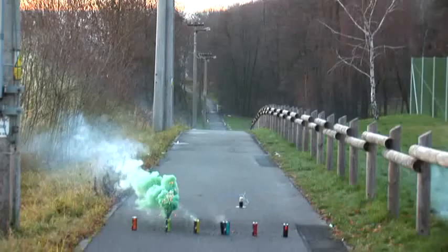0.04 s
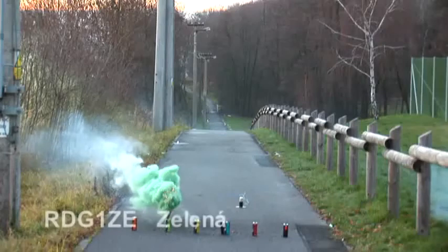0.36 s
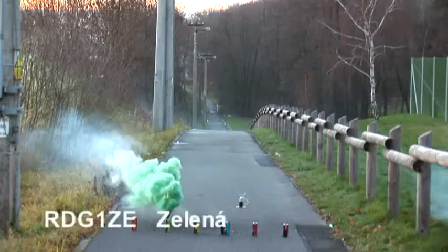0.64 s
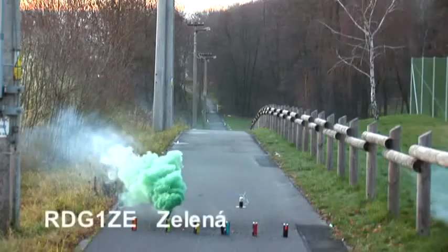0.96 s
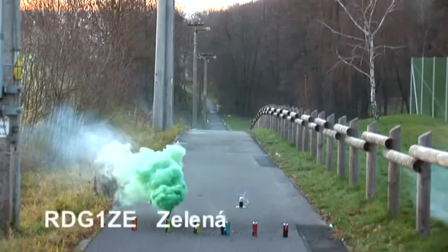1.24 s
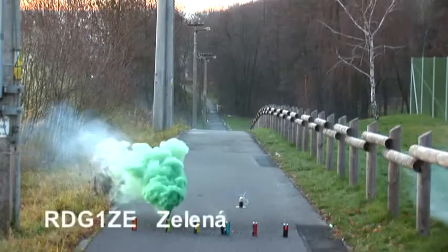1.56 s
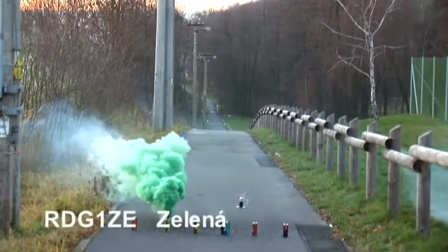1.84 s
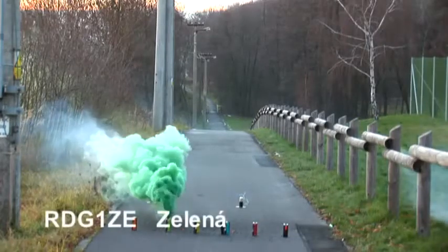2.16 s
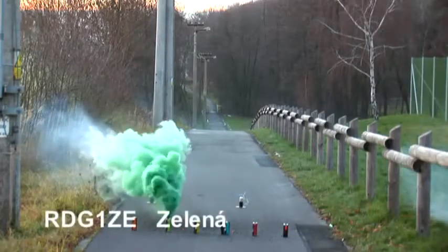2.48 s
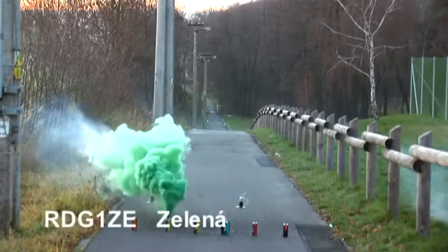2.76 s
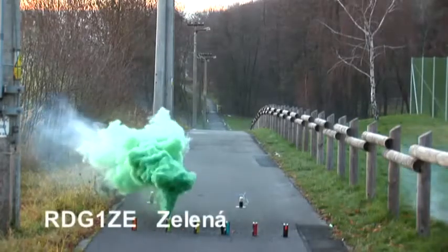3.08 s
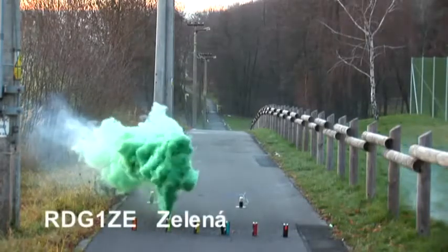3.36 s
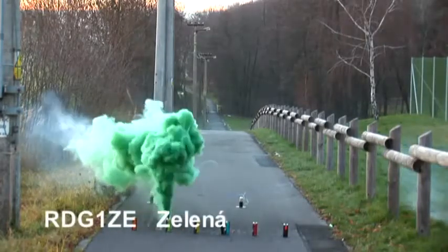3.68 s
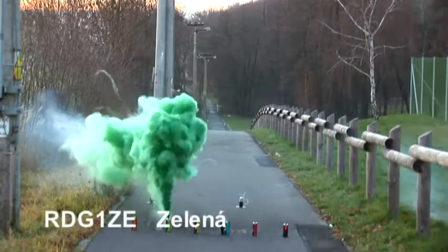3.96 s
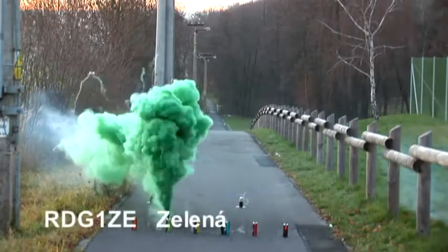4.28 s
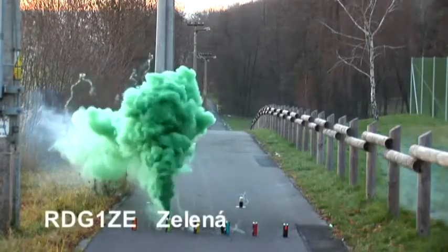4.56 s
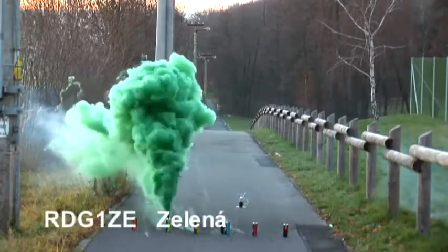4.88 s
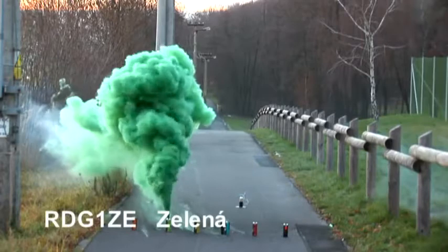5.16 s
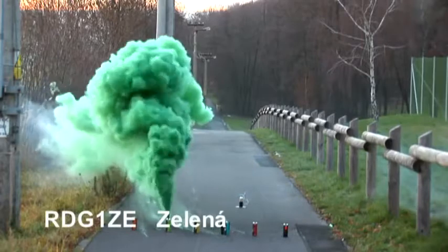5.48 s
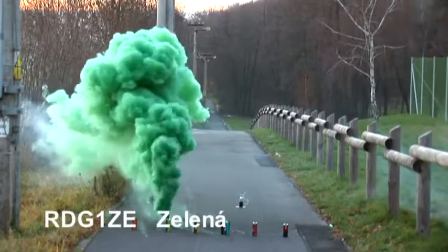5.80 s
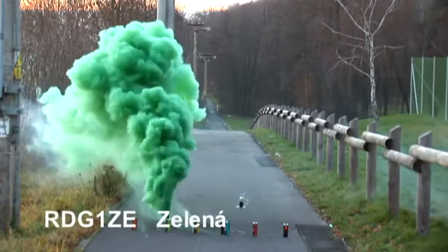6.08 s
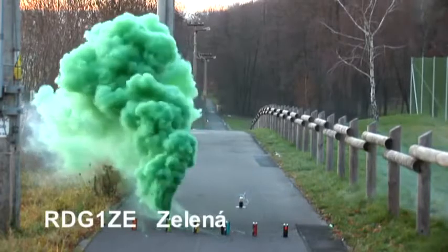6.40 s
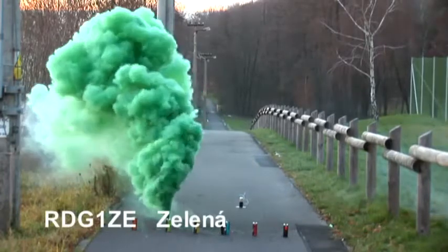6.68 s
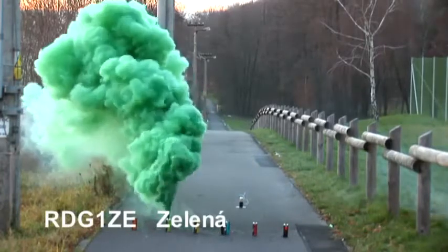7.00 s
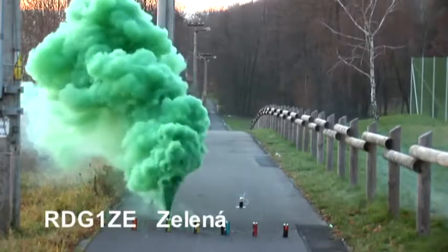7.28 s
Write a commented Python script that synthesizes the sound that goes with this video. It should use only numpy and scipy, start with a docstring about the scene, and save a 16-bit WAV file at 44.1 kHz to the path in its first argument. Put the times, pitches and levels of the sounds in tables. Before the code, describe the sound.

The sound starts abruptly at 0.2 seconds, outdoors, with a car's tyres rolling away on the left, drifting toward the centre and fading out by about 3 seconds. A steady wash and low rumble of distant traffic continues throughout. In front, a smoke canister hisses softly and unevenly, with a high sizzle and tiny crackles. It spits at 1.6 seconds and sizzles again near 1.9. From about 3.1 seconds the gas surges several times, peaking in a strong spurt at 3.5, followed by another spit and shorter surge near 4.4. The hiss then stays low with gentle swells. A faint, wavering engine drone emerges far away around 5 seconds, and the rumble grows slightly just before the end at 7.4. Underneath, the camera adds faint hiss, a thin motor whine and rapid light ticking, with sharper ticks near 2.2, 3.7, 4.1 and 5.8 seconds.

```python
"""Smoke canister on an outdoor path

Gas hisses and surges through the nozzle; slag sizzles, the charge crackles and spits now and then.
A car's tyres roll away on the left, leaving the wash, rumble and engine drone of distant traffic.
A small camera adds faint hiss, motor whine and drive ticks, a few louder. Sound starts abruptly at 0.2 s."""
import sys
import numpy as np
from scipy import signal
from scipy.fft import rfft, irfft
from scipy.io import wavfile

SR = 44100
rng = np.random.default_rng(int(sys.argv[2]) if len(sys.argv) > 2 else 0)


def int16_out(signal):
    """Quantize to a 16-bit WAV file."""
    q = np.round(np.clip(np.atleast_2d(signal).T, -1, 1) * 32767)
    wavfile.write(sys.argv[1], SR, q.astype(np.int16))


N = 328104
START_S = 0.197
TIME_S = np.arange(N) / SR
BINS_HZ = np.maximum(np.fft.rfftfreq(N, 1 / SR), 1)


def from_db(db):
    """Decibels to gain."""
    return 10 ** (np.asarray(db) / 20)


def unit_rms(x):
    """Scale to rms 1."""
    return x / np.sqrt(np.mean(x ** 2) + 1e-20)


def over_time(rows):
    """Each column of a curve, per sample."""
    t_s, *columns = np.transpose(rows)
    return [np.interp(TIME_S, t_s, c) for c in columns]


def over_hz(rows):
    """Each column of a spectrum, per bin."""
    hz, *columns = np.transpose(rows)
    return [np.interp(np.log(BINS_HZ), np.log(hz), c) for c in columns]


def colour(rows):
    """Gain per bin; falls 36 dB/octave beyond the table's ends."""
    outside = np.minimum(BINS_HZ / rows[0][0], 1) * np.minimum(rows[-1][0] / BINS_HZ, 1)
    return from_db(over_hz(rows)[0]) * outside ** 6


def white():
    """Spectrum of white noise."""
    return rfft(rng.standard_normal(N))


def drift(rate_hz):
    """Low-passed random wander, rms 1."""
    return unit_rms(irfft(white() / (1 + (BINS_HZ / rate_hz) ** 2), N))


def resonance(hz, width_hz):
    """Response of one mode, peak 1."""
    return 1 / (1 + 1j * (BINS_HZ ** 2 - hz ** 2) / (BINS_HZ * width_hz))


def band_noise(hz, width_hz):
    """Noise through a resonance twice, rms 1."""
    return unit_rms(irfft(white() * resonance(hz, width_hz) ** 2, N))


def stereo(mid, side):
    """Mid and side spectra to left and right signals, mid rms 1."""
    mid, side = irfft(mid, N), irfft(side, N)
    return np.array([mid + side, mid - side]) / np.std(mid)


def open_air(spectrum, response=1):
    """Diffuse coloured noise, near mono in the bass."""
    # stereo width: f/Hz, side over mid/dB
    width = [(60, -39), (150, -26.5), (280, -13.5), (450, -9), (750, -4.5), (1200, -8.5), (1700, -7.5),
             (2400, -12.5), (3200, -23), (4000, 0), (4500, -6), (5000, 0.5), (7300, 6.5), (8500, -12),
             (15000, -75)]
    gain = colour(spectrum) * response
    return stereo(gain * white(), gain * from_db(over_hz(width)[0]) * white())


def split(x, hz):
    """Complementary low and high bands."""
    low = irfft(rfft(x) / (1 + (BINS_HZ / hz) ** 12), N)
    return low, x - low


def decay(kicks, decay_s):
    """Exponential envelope after each kick."""
    return signal.lfilter([1], [1, -np.exp(-1 / (decay_s * SR))], kicks + 1e-18)


def nozzle_flow(burn_sizzle_db=-10.5, roundness=0.24):
    """Gas and sizzle gains: steady burn plus surges as pressure builds behind slag and lets go."""
    # gas from the steady burn: t/s, relative level/dB
    burn_curve = [(0.2, -71.5), (0.55, -74), (1.45, -78), (2.55, -75), (3.05, -71), (3.65, -73.5),
                  (3.9, -73), (4.6, -76.5), (5.05, -77.5), (5.9, -72), (6.3, -75.5), (6.93, -72),
                  (7.11, -72), (7.25, -72), (7.44, -69.5)]
    # pressure surges: peak t/s, relative gas level/dB, sizzle level/dB, rise/s, fall/s
    surges = [ (1.63, -81, -60, 0.006, 0.016), (1.865, -80, -63.5, 0.115, 0.06),
              (2.07, -82, -69.5, 0.02, 0.022), (2.76, -81, -74, 0.07, 0.04), (2.92, -84, -73, 0.022, 0.015),
              (3.135, -67.5, -75, 0.072, 0.06), (3.29, -68, -65, 0.092, 0.05),
              (3.425, -63, -61, 0.13, 0.05), (3.484, -56.5, -60, 0.077, 0.021),
              (3.562, -65, -67, 0.07, 0.014), (4.12, -75, -72.5, 0.018, 0.012),
              (4.376, -69, -60, 0.034, 0.043), (4.485, -76, -66, 0.06, 0.045), (5.45, -79, -73, 0.1, 0.07),
              (5.71, -89, -67.5, 0.12, 0.055), (7.32, -74, -76, 0.04, 0.03), ]
    burn = from_db(over_time(burn_curve)[0])
    gas_power, sizzle_power = burn ** 2, (burn * from_db(burn_sizzle_db)) ** 2
    for peak_s, gas_db, sizzle_db, rise_s, fall_s in surges:
        from_peak = np.maximum((peak_s - TIME_S) / rise_s, (TIME_S - peak_s) / fall_s).clip(max=20)
        surge = np.exp(roundness - np.hypot(from_peak, roundness))
        gas_power += (from_db(gas_db) * surge) ** 2
        sizzle_power += (from_db(sizzle_db) * surge) ** 2
    return np.sqrt(gas_power), np.sqrt(sizzle_power)


def ground_echo(gain=0.24, delay_s=0.00183, cutoff_hz=6500):
    """One bounce off the asphalt combs the spectrum."""
    return 1 + gain * np.exp(-2j * np.pi * BINS_HZ * delay_s) / (1 + (BINS_HZ / cutoff_hz) ** 4)


def smoke_jet(gas, sizzle, gas_gain_db=16.0, flutter_db=1.16, sputter_db=0.5, sizzle_side_db=-12.0):
    """Turbulent gas hisses and whistles faintly, brighter as it quickens; slag sizzles on top."""
    # jet spectrum: f/Hz, relative density/dB
    spectrum = [(900, -20), (1900, 15.5), (2200, 23), (3000, 22), (3850, 13), (4400, 2), (4950, 3),
                (5500, 1.5), (6900, -3), (7550, -8), (8100, 4), (8700, 3.5), (11000, 1), (15500, -8)]
    # nozzle modes: f/Hz, width/Hz, gain/dB
    modes = [(3870, 94, -12), (4965, 150, -5)]
    neutral_gas_db, brightening = -76, 0.067
    whistle = 1 + sum(from_db(db) * resonance(hz, width_hz) for hz, width_hz, db in modes)
    body, top = split(open_air(spectrum, whistle * ground_echo()), hz=12200)
    lows, highs = split(body, hz=3800)
    body = highs + lows * (from_db(neutral_gas_db) / gas) ** brightening
    body *= from_db(gas_gain_db + flutter_db * drift(rate_hz=18))
    # short waves reach the two microphone ports unevenly
    side = from_db(sizzle_side_db) * band_noise(hz=14000, width_hz=3900)
    top = unit_rms(top) + side * [[1], [-1]]
    top = unit_rms(top * from_db(sputter_db * drift(rate_hz=140)))
    return gas * body + sizzle * top


def crackle(gas, sizzle, level_db=-72):
    """The burning charge ticks at random, more often as sizzle gains on gas."""
    rate_hz = 35 * sizzle / gas
    kicks = (rng.random(N) < rate_hz / SR) * from_db(level_db + 2 * rng.standard_normal(N))
    noise = unit_rms(irfft(resonance(hz=12000, width_hz=2000) * white(), N))
    return decay(kicks, decay_s=0.003) * noise


def car_path(start_m=10.5, speed_m_per_s=14.3, screened_s=1.68):
    """Roar falls with distance, hiss grows a little; both fade once trees and slope screen the car."""
    # swells of the roar: t/s, gain/dB
    swells = [(0.2, -0.5), (0.3, 1), (0.45, 0), (0.68, 1), (0.85, -0.7), (1.08, 0), (1.3, 1.5), (1.55, 0)]
    hiss_rise_db_per_s, roar_loss_db_per_s, hiss_loss_db_per_s = 2.15, 12.5, 15.5
    driven_s = np.maximum(TIME_S - START_S, 0)
    hidden_s = np.maximum(TIME_S - screened_s, 0)
    spreading_db = 20 * np.log10(1 + speed_m_per_s * driven_s / start_m)
    roar_db = -35 + over_time(swells)[0] - spreading_db - roar_loss_db_per_s * hidden_s
    hiss_db = -51 + hiss_rise_db_per_s * driven_s - hiss_loss_db_per_s * hidden_s
    bearing = np.clip(0.42 - 0.11 * driven_s, 0, 1)  # 0 ahead, 1 hard left
    return roar_db, hiss_db, bearing


def car(direct_share=0.76, ground_db_per_s=5.0, air_db_per_s=6.5, flutter_db=0.45):
    """Receding tyre noise swings from left to centre; soft ground absorbs its lows, air its highs."""
    # tyre spectrum: f/Hz, relative density/dB
    spectrum = [(200, -24), (450, -12.5), (720, -7.7), (835, -7), (915, -2), (980, -3), (1260, -4),
                (1450, -14), (1650, -7), (2050, -8.5), (2450, -4.5), (2780, -6.5), (3000, -10), (3700, -15),
                (4450, -25), (5050, -23.5), (5350, -25.5), (5950, -32.5), (7000, -72)]
    # arrival from the left: f/Hz, side over mid/dB, phase lead/rad
    from_left = [(200, -1, 2.2), (500, 3.5, 1.4), (900, 5, 0.5), (1350, 4.5, 0.6), (1550, 6, -2),
                 (2000, -1, 1.3), (2800, -1, 1.5), (3600, 3, 2.3), (4400, 15, 2), (5030, 4, 0),
                 (6540, 38.5, 1.5)]
    roar_db, hiss_db, bearing = car_path()
    side_db, lead_rad = over_hz(from_left)
    tyres, gain = white(), colour(spectrum)
    direct = np.sqrt(direct_share) * np.exp(1j * lead_rad) * tyres
    tree_scatter = np.sqrt(1 - direct_share) * white()
    hard_left = stereo(gain * tyres, gain * from_db(side_db) * (direct + tree_scatter))
    mid = hard_left.mean(axis=0)
    roar, hiss = split(mid + bearing * (hard_left - mid), hz=2144)
    lows, tread = split(roar / np.std(roar.mean(axis=0)), hz=700)
    swish, highs = split(hiss / np.std(hiss.mean(axis=0)), hz=4470)
    roar = from_db(roar_db) * (tread + from_db(-ground_db_per_s * TIME_S) * lows)
    hiss = from_db(hiss_db) * (swish + from_db(-air_db_per_s * TIME_S) * highs)
    return from_db(flutter_db * drift(rate_hz=16)) * (roar + hiss)


def traffic_wash(waver_db=0.5, pan_db=0.3, left_lag_s=0.00003):
    """Tyres on far roads swell and ebb, slightly to the right."""
    # wash spectrum: f/Hz, relative density/dB
    spectrum = [(250, -5.5), (430, -8), (560, -6.5), (690, -2.5), (840, -3.2), (970, 1.1), (1250, 0.6),
                (1500, -2.5), (2000, -7.5), (2250, -7.5), (2850, -12.5), (3700, -26.5), (4450, -33.5),
                (7500, -58)]
    # traffic flow: t/s, level/dB
    flow = [(0.2, -45), (1.7, -45), (2.5, -44), (2.92, -43.5), (3.1, -45), (3.22, -44.5), (3.5, -44),
            (3.82, -46), (4.08, -45), (4.7, -45), (4.92, -44), (5.38, -45), (5.65, -44.5), (5.87, -44.5),
            (6.13, -44), (6.28, -45), (6.75, -43), (7.44, -44)]
    level_db = over_time(flow)[0] + waver_db * drift(rate_hz=15)
    left, right = from_db(level_db) * open_air(spectrum)
    left = np.interp(TIME_S - left_lag_s, TIME_S, left)
    return np.array([from_db(-pan_db) * left, from_db(pan_db) * right])


def traffic_rumble(flutter_db=0.64):
    """Low noise of far roads, swelling at the end."""
    # rumble spectrum: f/Hz, relative density/dB
    spectrum = [(15, -25), (28, -11), (45, -12), (59, 5.5), (69, -5), (88, -5), (102, 0.5), (122, -4),
                (140, -7), (218, -13), (245, -21), (330, -23.5), (480, -33.5)]
    # rumble envelope: t/s, level/dB
    envelope = [(0.2, -42.5), (2.4, -43), (7.0, -42.5), (7.44, -38)]
    level_db = over_time(envelope)[0] + flutter_db * drift(rate_hz=11)
    return from_db(level_db) * open_air(spectrum)


def camera(hiss_db=-75.0):
    """Steady self-noise and a thin motor whine."""
    # hiss spectrum: f/Hz, relative density/dB
    spectrum = [(4000, -23), (6000, 19), (7400, -18), (8300, 9.5), (12500, 17), (14300, 17), (15300, -11)]
    # motor tones: f/Hz, width/Hz, level/dB
    tones = [(628, 17, -67.5), (711.6, 7, -63.5)]
    whine = sum(from_db(db) * band_noise(hz, width_hz) for hz, width_hz, db in tones)
    return from_db(hiss_db) * open_air(spectrum) + whine


def camera_drive(turn_hz=26.4, whirr_db=-78, tick_db=-60.2):
    """The drive whirrs and ticks once a turn, uneven in strength, ringing the casing."""
    # casing modes: f/Hz, width/Hz, left gain, right gain
    modes = [(5830, 430, 0.43, -0.9), (11700, 1300, 0.16, 0.42)]
    new_turn = np.diff(np.floor(TIME_S * turn_hz + 0.5), prepend=0)
    ticks = decay(new_turn * from_db(tick_db + 2 * rng.standard_normal(N)), decay_s=0.0022)
    casing = sum(band_noise(hz, width_hz) * [[left], [right]] for hz, width_hz, left, right in modes)
    return casing * (from_db(whirr_db) + ticks)


def bright_bursts():
    """Short bright ticks and spits, from sparks or the camera drive, each with a brief ring."""
    # bursts: t/s, noise level/dB, decay/s, ring f/Hz, ring width/Hz, ring gain/dB, left over right/dB
    ticks_and_spits = [ (1.152, -66.5, 0.003, 5400, 900, -8, 0), (1.263, -62, 0.005, 5400, 900, -8, 4),
                       (1.622, -65.5, 0.018, 3100, 450, 30, 0), (2.159, -65.5, 0.003, 5400, 900, -6, 1.5),
                       (2.222, -59.5, 0.002, 5400, 900, -12, 3), (2.494, -62, 0.002, 5400, 900, -3, 3),
                       (3.737, -58.5, 0.002, 4800, 900, -2, -5), (3.96, -64, 0.003, 5400, 900, -6, 0),
                       (4.108, -61, 0.005, 5400, 900, 5, 0), (4.126, -63, 0.006, 5400, 900, -8, 0),
                       (4.351, -67.5, 0.036, 4700, 3800, 8.5, 0), (4.353, -72, 0.022, 3200, 400, 27, 10),
                       (5.508, -64.5, 0.003, 5800, 700, 9, 0), (5.518, -69, 0.003, 5800, 700, 11, 0),
                       (5.565, -69, 0.005, 5700, 700, 10, 0), (5.81, -58, 0.004, 5900, 700, 6, 0),
                       (6.333, -65, 0.003, 5800, 700, 0, 0), ]
    bright = resonance(hz=12600, width_hz=2100)
    bright_rms = np.sqrt(np.mean(np.abs(bright) ** 2))
    out = np.zeros((2, N))
    for t_s, level_db, decay_s, ring_hz, width_hz, ring_db, left_db in ticks_and_spits:
        ring = from_db(ring_db) * resonance(ring_hz, width_hz) ** 2
        burst = irfft((bright + ring) * white(), N) / bright_rms
        gain = from_db(level_db + left_db * np.array([[0.5], [-0.5]]))
        envelope = (TIME_S >= t_s) * np.exp(-np.abs(TIME_S - t_s) / decay_s)
        out += gain * burst * envelope
    return out


def far_engine(pitch_wander=0.0074):
    """One engine's wavering drone slowly emerges from the traffic."""
    # engine tone: t/s, f/Hz, level/dB
    drone = [(0.2, 330, -87), (4.4, 324.3, -68), (5.1, 306.6, -60.5), (6.2, 310.9, -61),
             (7.44, 310.3, -58.5)]
    hz, level_db = over_time(drone)
    cycles = np.cumsum(hz * (1 + pitch_wander * drift(rate_hz=23.5))) / SR
    return from_db(level_db) * np.sin(2 * np.pi * cycles)


def scene():
    """Canister in front, roads behind, camera close by."""
    gas, sizzle = nozzle_flow()
    foreground = smoke_jet(gas, sizzle) + crackle(gas, sizzle) + bright_bursts()
    roads = car() + traffic_wash() + traffic_rumble() + far_engine()
    return foreground + roads + camera() + camera_drive()


def record(dry, fade_in_s=0.0033, cutoff_hz=15450):
    """The microphone housing rings a little; abrupt onset, steep low-pass."""
    # housing modes: f/Hz, width/Hz, gain/dB
    modes = [(930, 24, -13), (1080, 32, -21), (1260, 35, -16), (2360, 260, -20), (4910, 145, -3)]
    housing = sum(from_db(db) * resonance(hz, width_hz) for hz, width_hz, db in modes)
    ring = irfft(housing * rfft(dry.mean(axis=0)), N)
    onset = np.clip((TIME_S - START_S) / fade_in_s, 0, 1)
    lowpass = signal.ellip(10, 0.1, 70, cutoff_hz, fs=SR, output="sos")
    return signal.sosfilt(lowpass, (dry + ring) * onset)


dry = scene()
out = record(dry)
int16_out(out)
```